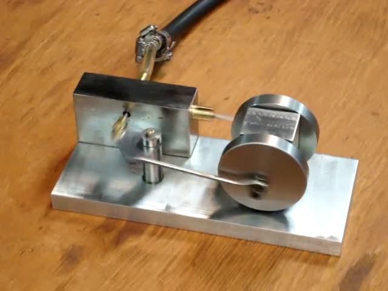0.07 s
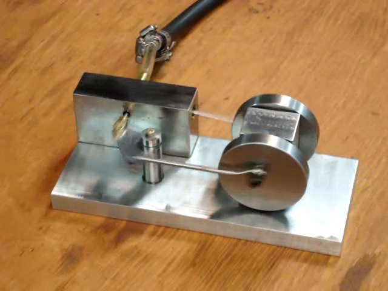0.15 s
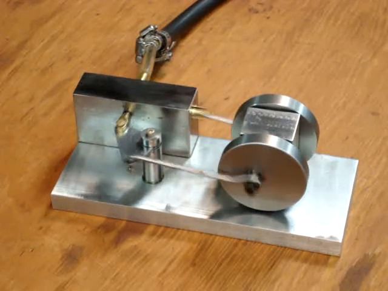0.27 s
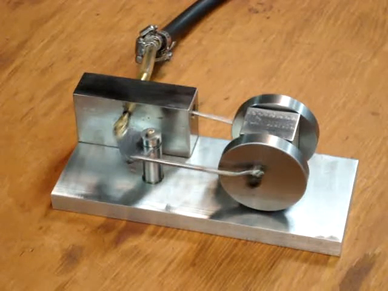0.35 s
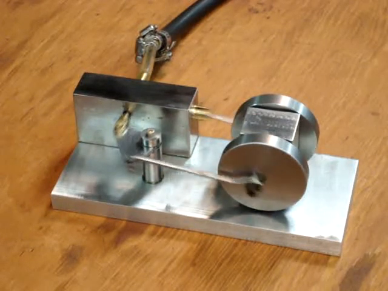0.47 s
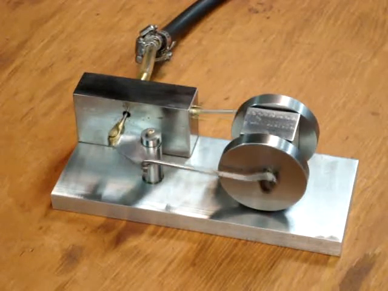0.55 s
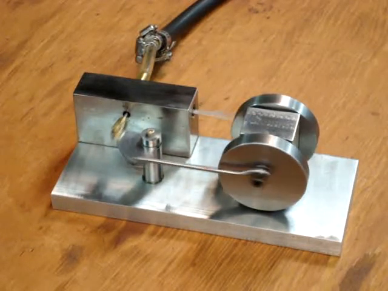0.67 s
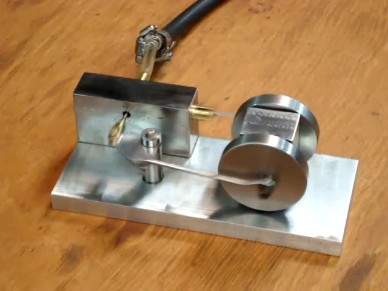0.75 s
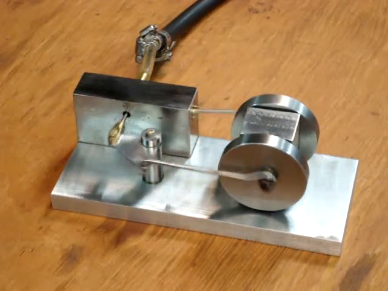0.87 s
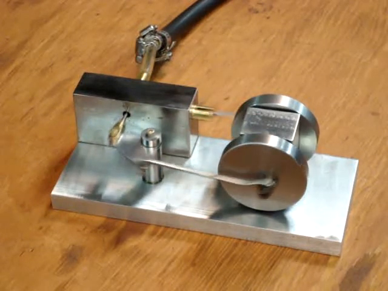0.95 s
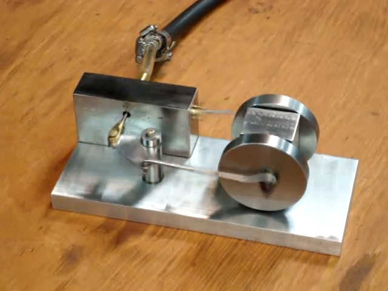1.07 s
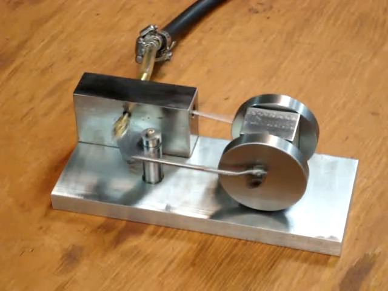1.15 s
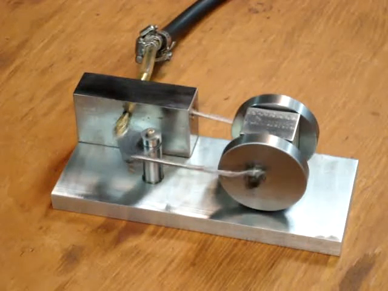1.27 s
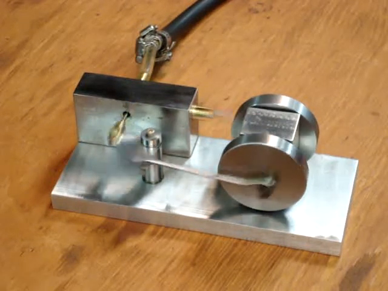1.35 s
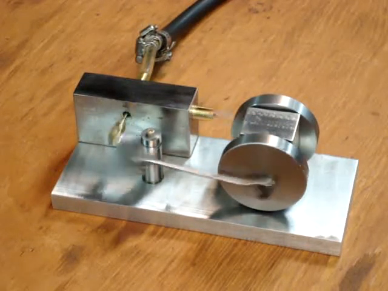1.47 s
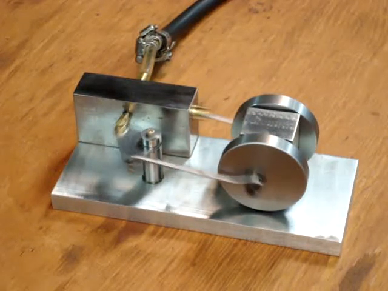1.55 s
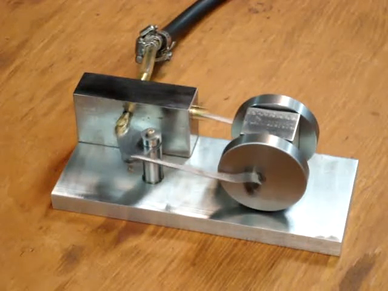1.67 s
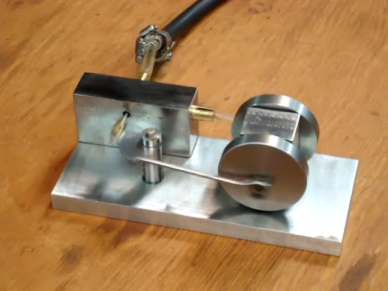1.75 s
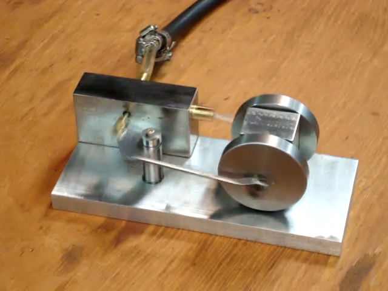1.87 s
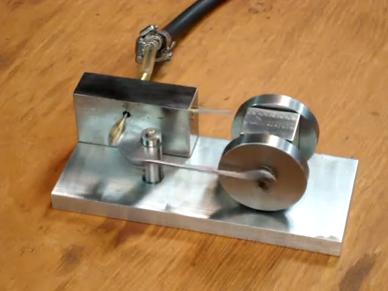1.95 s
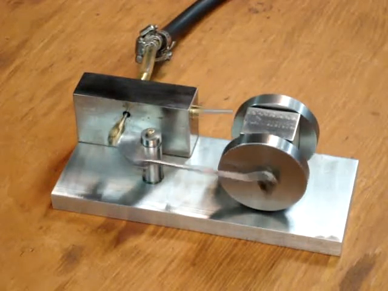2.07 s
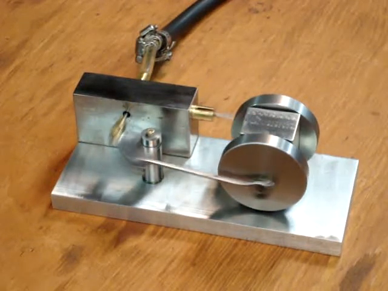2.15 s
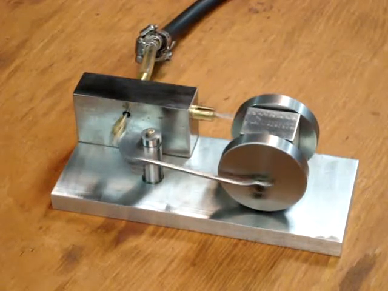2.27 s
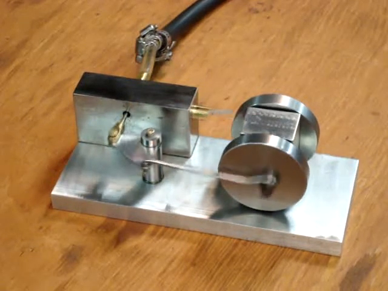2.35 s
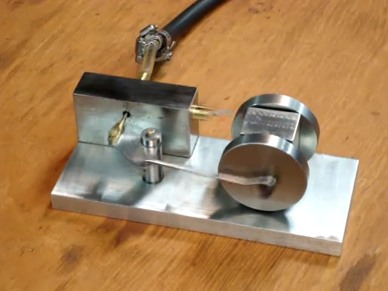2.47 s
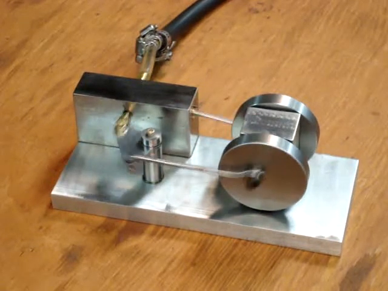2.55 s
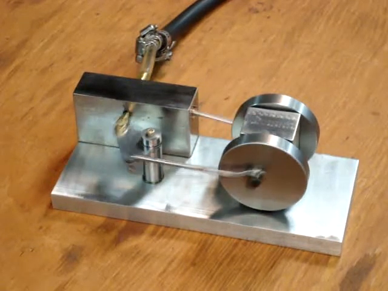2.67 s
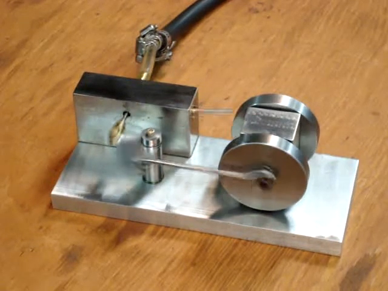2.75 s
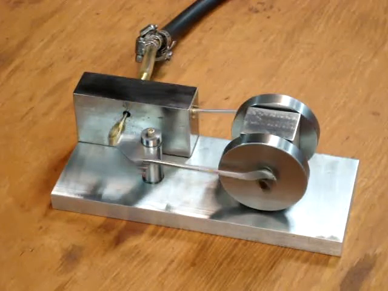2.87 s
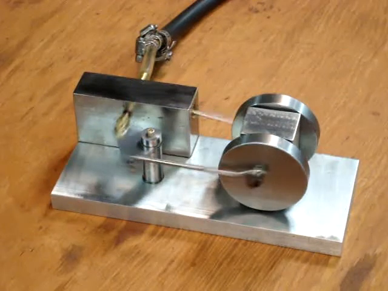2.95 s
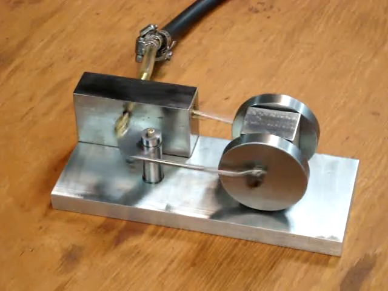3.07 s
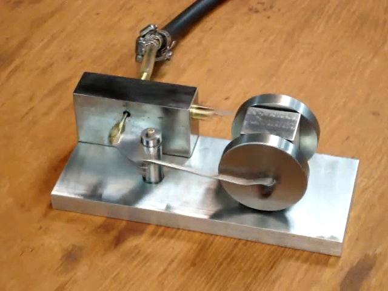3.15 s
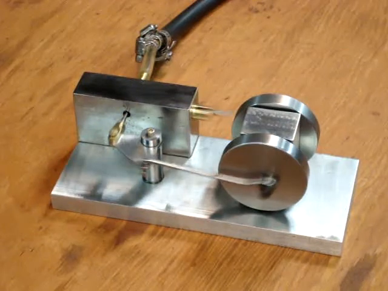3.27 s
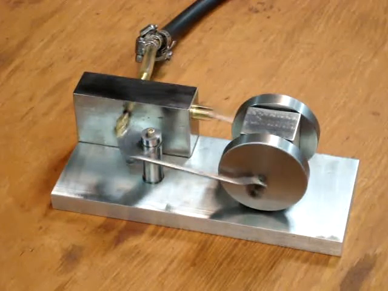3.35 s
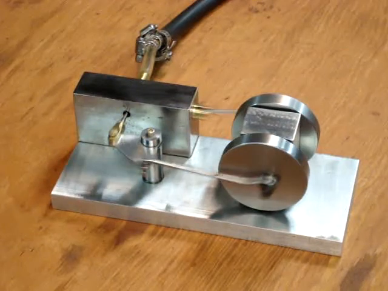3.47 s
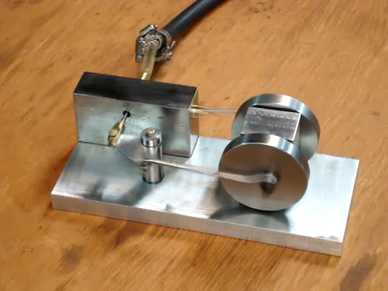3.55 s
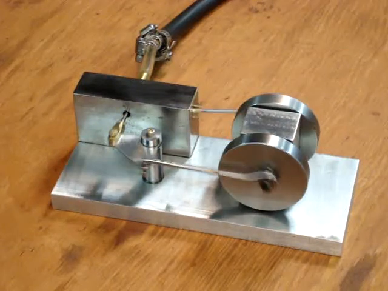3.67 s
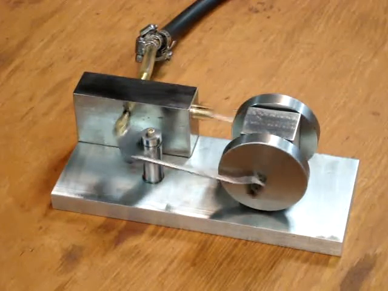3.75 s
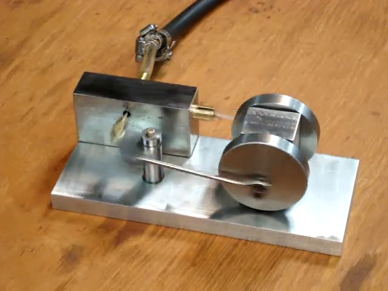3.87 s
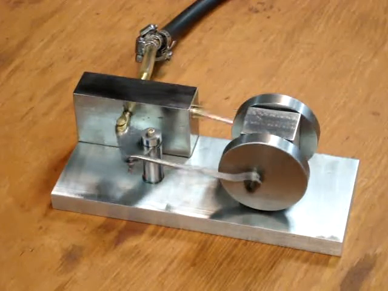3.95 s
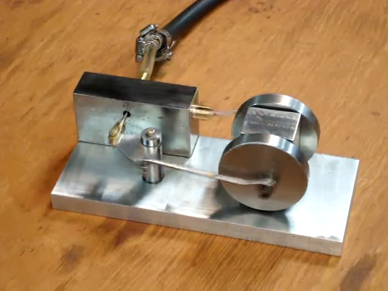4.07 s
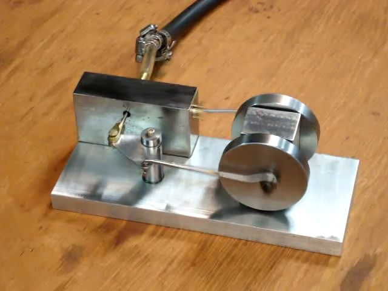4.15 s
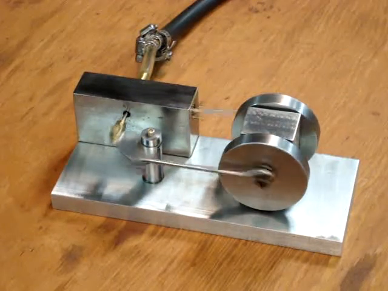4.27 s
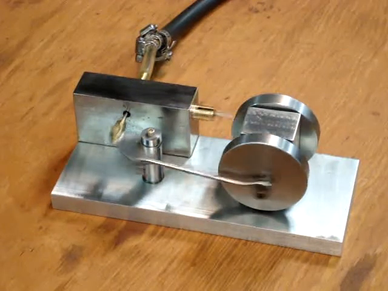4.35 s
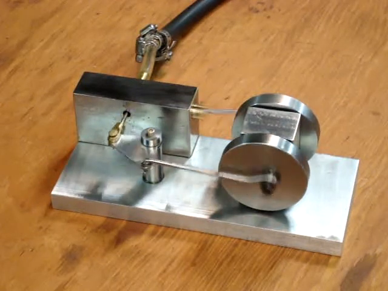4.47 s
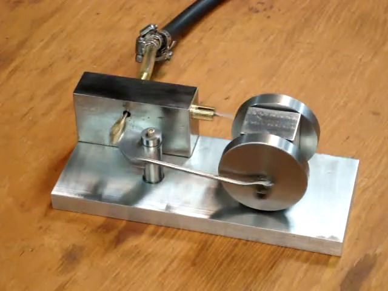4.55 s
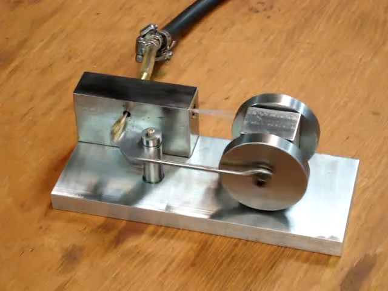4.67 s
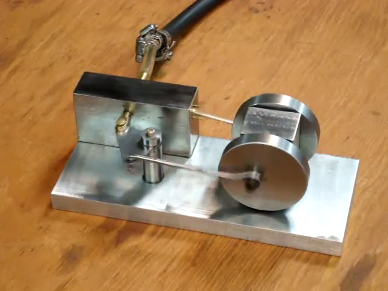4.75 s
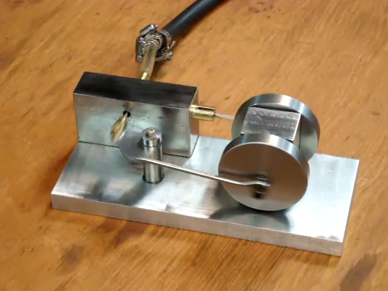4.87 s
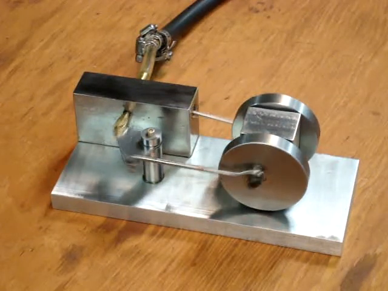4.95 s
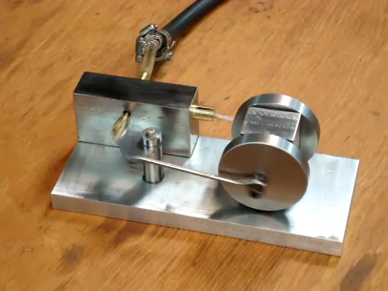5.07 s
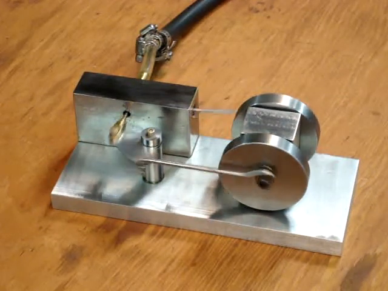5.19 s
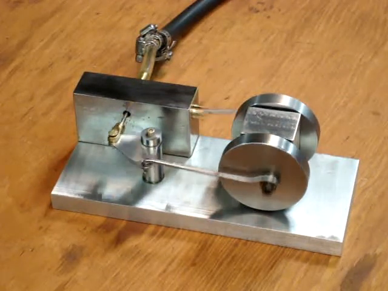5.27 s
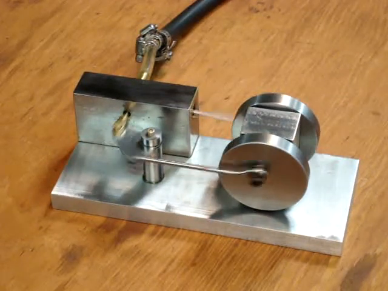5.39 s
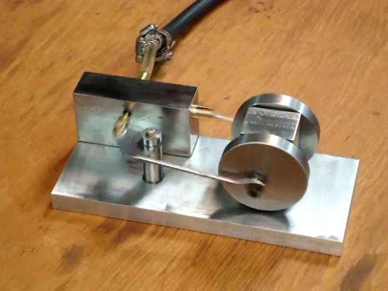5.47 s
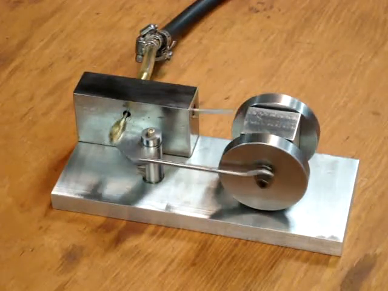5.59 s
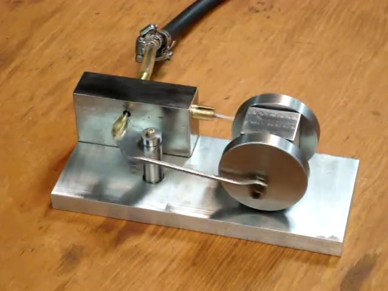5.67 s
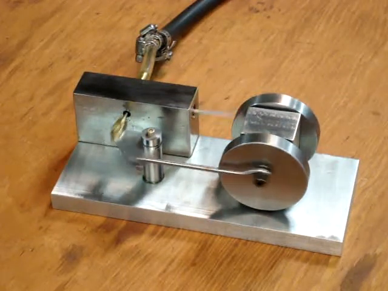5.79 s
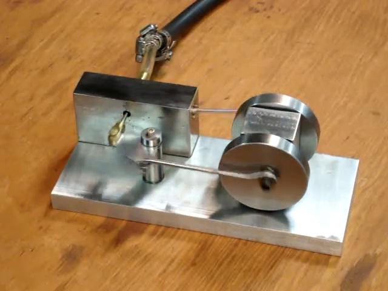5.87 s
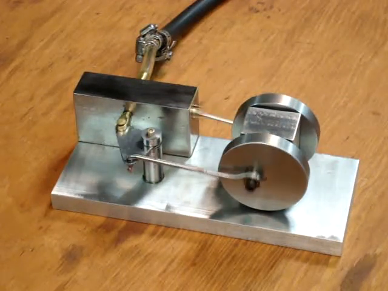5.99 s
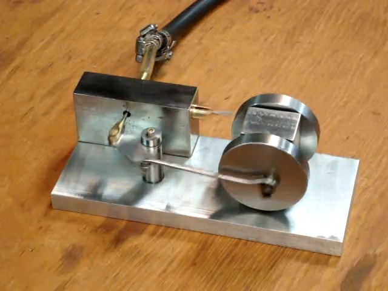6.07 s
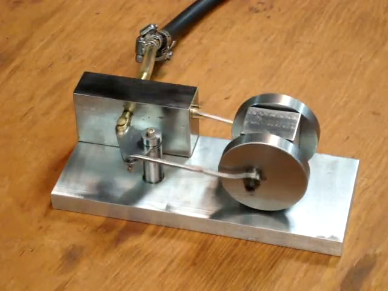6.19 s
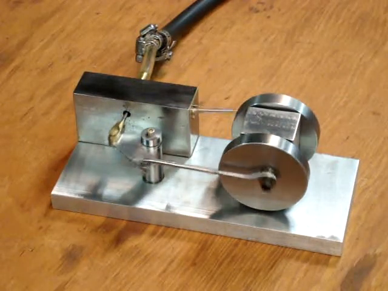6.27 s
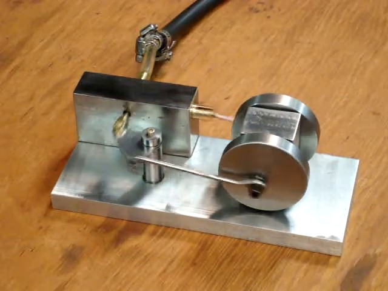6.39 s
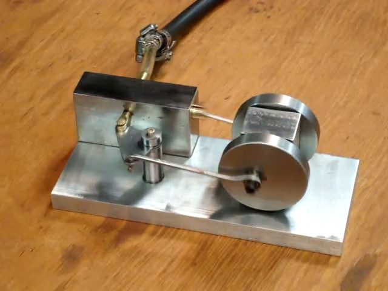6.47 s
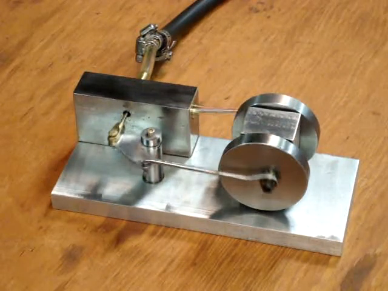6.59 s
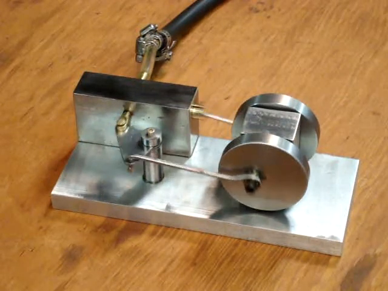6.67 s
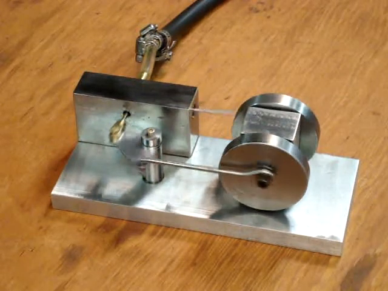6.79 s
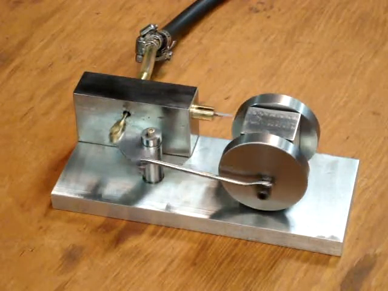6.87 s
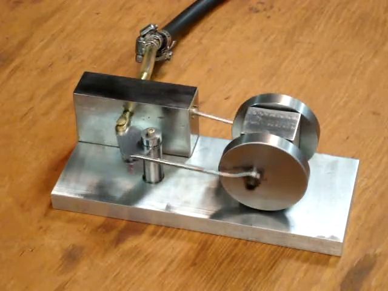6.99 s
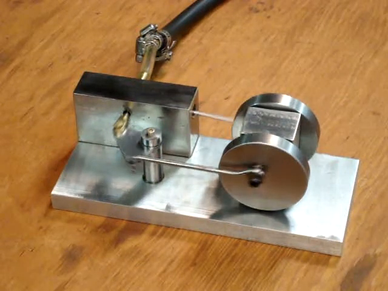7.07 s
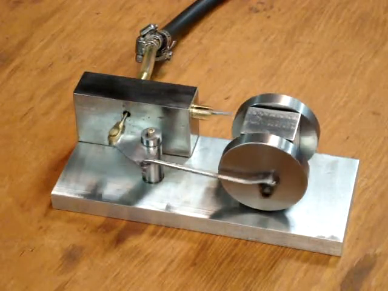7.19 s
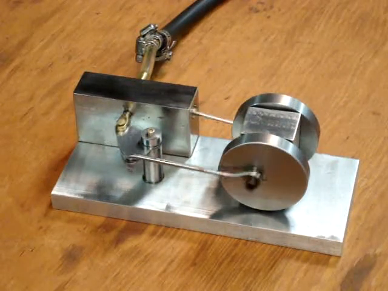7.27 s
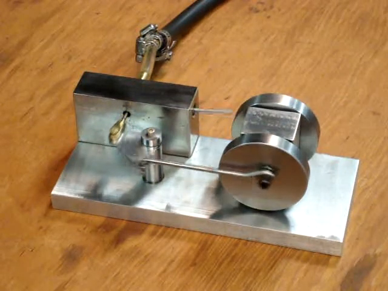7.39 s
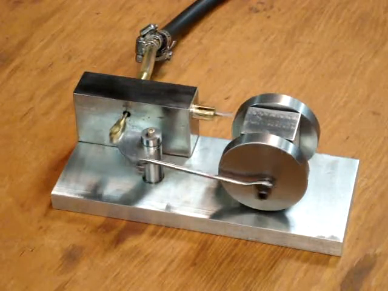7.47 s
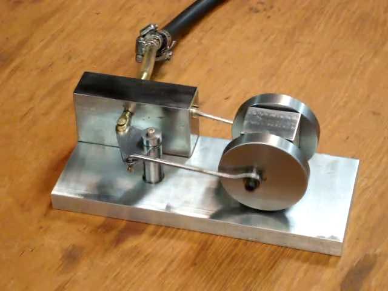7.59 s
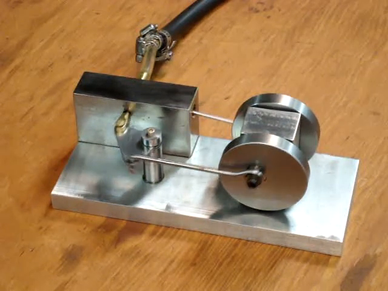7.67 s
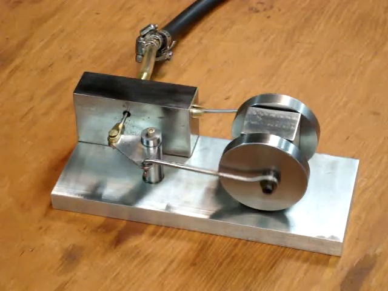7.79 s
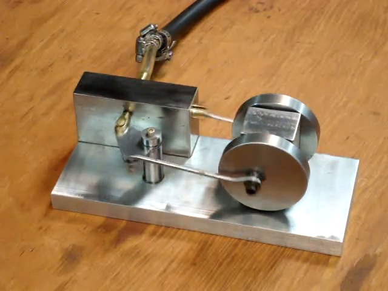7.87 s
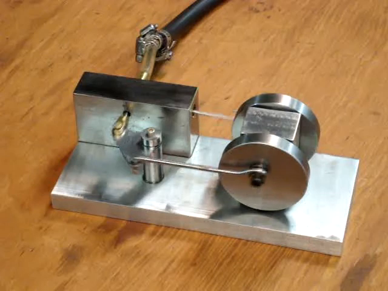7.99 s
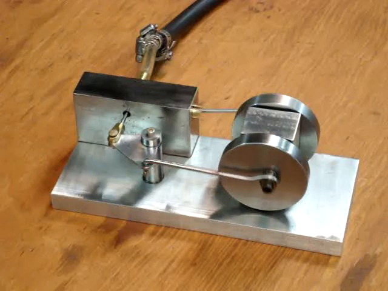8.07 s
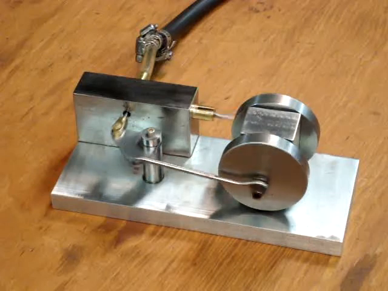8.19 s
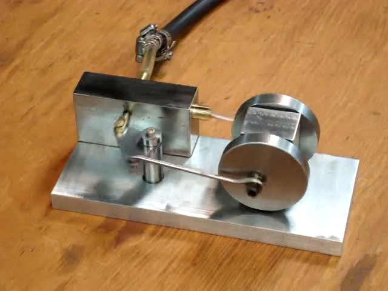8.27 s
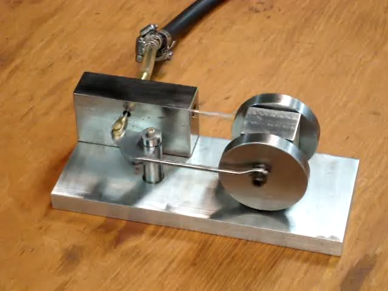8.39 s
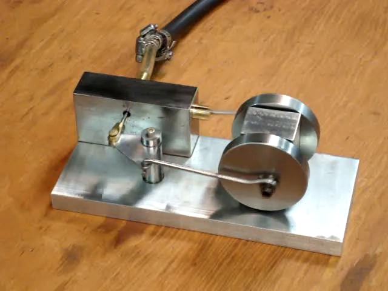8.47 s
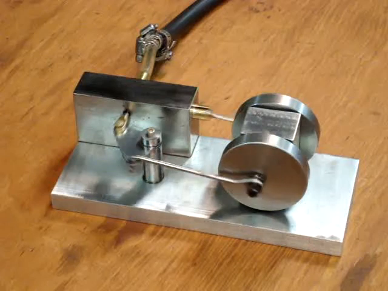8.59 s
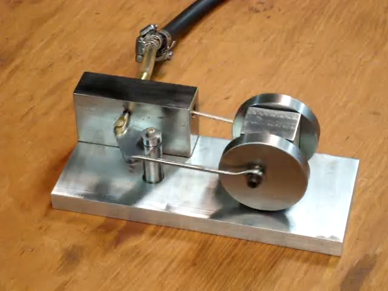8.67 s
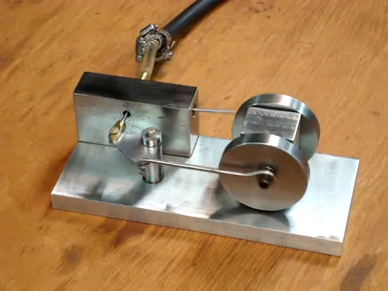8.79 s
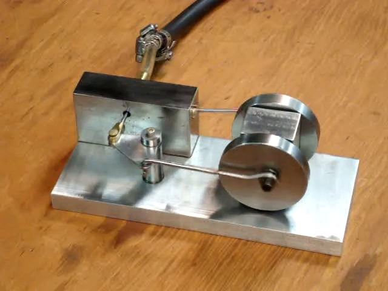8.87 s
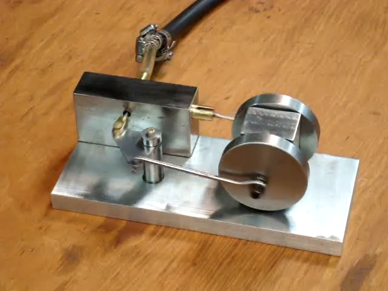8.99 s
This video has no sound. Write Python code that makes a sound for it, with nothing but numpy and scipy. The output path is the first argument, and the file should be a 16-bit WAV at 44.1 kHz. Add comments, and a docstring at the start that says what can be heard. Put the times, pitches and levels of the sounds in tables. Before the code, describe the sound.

A small metal compressed-air engine is already running, close by, at about six turns a second. Each turn brings a dry knock, two raspy exhaust puffs and a bright metallic tick, over a rumble through its base plate and the wooden table. Around 1 second the hissing puffs swell and the engine speeds up, reaching eight turns a second just before 2 seconds. The knocks are hardest between 2 and 3 seconds, as a long, steady slowdown begins and the air softens. Near 6 seconds the regular ticking breaks into a few stray clicks, and the puffs become soft, uneven chuffs. By 7 seconds the knock has almost gone. The engine crawls on with quiet chuffs and dull bumps, still making about two and a half turns a second at the end, around 9 seconds. Faint electric hum and small-room tone lie underneath.

```python
"""A small metal compressed-air engine runs on a wooden table, in a small room with a faint electric hum.
From the start, each turn brings a rod knock, two exhaust puffs and a valve-link tick, while the shaft
rumbles through base plate and table top. Around 1 s a burst of air swells the puffs and the flywheel
speeds up; from 2 s it winds down. Near 6 s the link goes slack and the puffs turn into soft, uneven
chuffs. By 7 s the knock has all but gone, and the engine crawls on to the end."""
import sys
import numpy as np
from scipy import signal
from scipy.fft import rfft, irfft
from scipy.io import wavfile

SR = 44100
rng = np.random.default_rng(int(sys.argv[2]) if len(sys.argv) > 2 else 0)


def to_wav(sig):
    """Store sig (one row per channel, or 1-D mono) as 16-bit WAV at the path in sys.argv[1].

    Samples outside -1..1 are clipped; the rate is SR.
    """
    pcm = np.clip(np.atleast_2d(sig), -1, 1) * 32767
    pcm = np.round(pcm).astype(np.int16)
    wavfile.write(sys.argv[1], SR, pcm.T)  # frames by channels


N = 398223
TIME = np.arange(N) / SR


def undb(db):
    """Decibels to gain."""
    return 10 ** (np.asarray(db) / 20)


def unit(x):
    """Scale to rms 1."""
    return x / np.sqrt(np.mean(x ** 2))


def seconds(length):
    """Sample times over a length in seconds."""
    return np.arange(int(length * SR)) / SR


def noise():
    """Fresh white noise."""
    return rng.standard_normal(N)


def lowpass(x, hz, order=4):
    """Roll off the highs."""
    return signal.sosfilt(signal.butter(order, hz, fs=SR, output="sos"), x)


def through(x, response):
    """Pass a sound through an impulse response."""
    return signal.fftconvolve(x, response)[:len(x)]


def colour(x, points):
    """Minimum-phase EQ through (f/Hz, level/dB) points, scaled to unit power gain."""
    hz, db = np.transpose(points)
    size = 4096
    bin_hz = np.arange(size // 2 + 1) * SR / size
    gain = undb(np.interp(np.log(bin_hz + 1), np.log(hz), db))
    cepstrum = irfft(np.log(unit(gain)))
    cepstrum[1:size // 2] *= 2
    cepstrum[size // 2 + 1:] = 0
    return through(x, irfft(np.exp(rfft(cepstrum))))


def ring(modes):
    """Impulse response of damped modes."""
    t = seconds(.5)
    return sum(undb(db) * np.cos(2 * np.pi * hz * t) * undb(-60 * t / t60) for hz, db, t60 in modes)


def blows(times, db):
    """One impulse for each hit."""
    out, at = np.zeros(N), np.round(times * SR).astype(int)
    inside = (at >= 0) & (at < N)
    np.add.at(out, at[inside], undb(db)[inside])
    return out


def diffuse(t60, rise):
    """Dense reflections that build up and die away; unit energy."""
    t = seconds(.5)
    tail = rng.standard_normal(len(t)) * undb(-60 * t / t60) * (1 - np.exp(-(t / rise) ** 2))
    return tail / np.sqrt(np.sum(tail ** 2))


def swells(times, db, widths, skew=0):
    """A bell-shaped envelope around each time; skew makes the attack faster than the release."""
    envelope = np.zeros(N)
    for at, gain, width in zip(times, undb(db), widths):
        i = np.arange(max(int((at - 5 * width) * SR), 0), min(int((at + 5 * width) * SR), N))
        lag = i / SR - at
        envelope[i] += gain * np.exp(-(lag / (width * np.exp(skew * np.sign(lag)))) ** 2 / 2)
    return envelope


def wander(hz):
    """Smooth random modulation up to a given rate; rms 1."""
    return unit(lowpass(noise(), hz, order=2))


def whistle(hz, width_hz):
    """Turbulence in a narrow gap: a breathy band of noise on a steady or moving pitch."""
    phase = 2 * np.pi * np.cumsum(np.broadcast_to(hz, N)) / SR
    return unit(wander(width_hz / 2) * np.cos(phase) + wander(width_hz / 2) * np.sin(phase))


# Mains hum partials: f/Hz, level/dB
HUM_PARTIALS = [(120, -89.5), (240, -73.5), (1320, -91), (1560, -73.5), (1680, -83.5)]
# Room tone EQ: f/Hz, level/dB (relative)
ROOM_TONE_EQ = [(25, -8.5), (60, -6.5), (120, -1.5), (200, 3), (450, 12), (1000, 4), (1800, 1), (3000, 0),
                (5000, -3), (8000, -7.5), (10200, -10)]
def background():
    """The bed: soft, steady room tone and an electric hum."""
    hum = sum(undb(db) * np.sqrt(2) * np.sin(2 * np.pi * (hz * TIME + rng.random()))
              for hz, db in HUM_PARTIALS)
    return hum + undb(-57) * colour(noise(), ROOM_TONE_EQ)


def room(x, early_db, late_db):
    """Add reflections from nearby things, then the tail of a small room."""
    early = undb(early_db) * diffuse(t60=.017, rise=.0011)
    late = undb(late_db) * diffuse(t60=.31, rise=.02)
    return x + through(x, early + late)


# Flywheel speed curve: t/s, speed/(turns per s)
SPEED_CURVE = [(0.0, 5.715), (0.56, 5.678), (0.89, 6.003), (1.43, 7.628), (1.71, 8.022), (2.03, 8.01),
               (3.02, 7.51), (3.56, 7.032), (4.78, 5.574), (5.54, 4.852), (6.72, 3.662), (8.14, 2.808),
               (9.03, 2.535)]
FULL_SPEED, SLACK_SPEED = 8, 4.5  # turns per s; the valve gear hangs loose below the slack speed
def speed(t):
    """Turns per second of the flywheel at the given times."""
    return np.interp(t, *np.transpose(SPEED_CURVE))


def by_speed(t, full_db, slope_db):
    """A level that rides the flywheel: full_db at full speed, plus slope_db per doubling."""
    return full_db + slope_db * np.log2(speed(t) / FULL_SPEED)


def flywheel():
    """The engine's clock: angle in turns, time of each dead centre and length of the turn after it."""
    t = seconds(N / SR + 1)
    angle = np.cumsum(speed(t)) / SR
    angle = angle - np.interp(.0298, t, angle)  # time of the first dead centre
    centres = np.interp(np.arange(int(angle[N]) + 2), angle, t)
    return angle[:N], centres[:-1], np.diff(centres)


# Air supply, opened up briefly and then eased off: t/s, level/dB
PRESSURE_CURVE = [(0, -16.5), (.48, -16.5), (.8, -9), (1.12, -5.5), (1.32, -7), (1.7, -12.5), (3, -17.5),
                  (4.4, -23.5), (5.9, -25), (6.8, -25.5), (9.03, -24)]
def pressure(t):
    """Air pressure at the valve, in dB."""
    return np.interp(t, *np.transpose(PRESSURE_CURVE))


def sliding_air(angle):
    """Grainy rush of air along the piston and valve rod, strongest at mid-stroke and high pressure."""
    db = by_speed(TIME, -55, slope_db=11) + pressure(TIME) + 11 * wander(300)
    rush = colour(noise(), [(300, -23), (2500, 3.5), (4200, 10), (6200, 7), (7500, -16), (10000, -14)])
    return undb(db) * np.abs(np.sin(2 * np.pi * angle)) * rush


def leaks(times, period, angle, out_db, back_db):
    """Air squeezed past the piston rises in pitch toward dead centre; the valve slit whistles down."""
    from_centre = (angle + .5) % 1 - .5
    squeeze_hz = np.interp(from_centre, [-.07, .01], [1950, 2700])
    squeeze = swells(times - .003, out_db - 10.5, .039 * period) * whistle(squeeze_hz, width_hz=530)
    leak_db = 2 * (back_db - back_db.max())  # the valve only leaks audibly at high pressure
    slit_hz = np.interp(angle % 1, [.40, .56], [9700, 7300])
    slit = swells(times + .49 * period, leak_db - 45.5, .05 * period) * whistle(slit_hz, width_hz=900)
    spray = swells(times + .27 * period, leak_db - 42, .019 * period) * whistle(9200, width_hz=1800)
    closing = swells(times + .88 * period, leak_db - 48.5, .07 * period) * whistle(6700, width_hz=960)
    return squeeze + slit + spray + closing


# Light play in the valve gear: angle/turns, level/dB at full speed
PIN_HITS = [(.118, -40.5), (.622, -42)]
# Ring of small steel pins: f/Hz, level/dB, t60/s
PIN_MODES = [(2970, -5, 0.02), (4090, -5, 0.012), (6550, -3, 0.023), (8600, -5, 0.01), (9300, -2.5, 0.0069)]
def pins(times, period):
    """Faint uneven clicks as the valve gear's pins shift in their holes, until the gear goes slack."""
    driven = speed(times) > SLACK_SPEED
    times, period, contact = times[driven], period[driven], 0
    for turn, db in PIN_HITS:
        timing, accent = rng.standard_normal((len(times), 2)).T
        at = times + (turn + .0041 * timing) * period
        contact = contact + blows(at, by_speed(at, db, slope_db=13) + 2 * accent)
    clicks = through(contact, ring(PIN_MODES))
    return colour(clicks, [(300, -27), (2500, 3.5), (4000, 4.5), (10000, -1.5)])


# Two swells of rumble in the power stroke: angle/turns, level/dB against the load, width/turns
RUMBLE_SWELLS = [(0.146, -3, 0.033), (0.321, -0.5, 0.03)]
LOAD_DB, LOAD_SLOPE_DB = -41, 8  # force of the running shaft on the table
def shaft(times, period, angle):
    """Shaft rumble: constant rubbing, a thump and dull swells each turn, a bump as the valve reverses."""
    load_db = by_speed(TIME, LOAD_DB, LOAD_SLOPE_DB)
    stroke_db = by_speed(times, LOAD_DB, LOAD_SLOPE_DB)
    # the same rough spots come round on every turn
    spots = 40
    offset, roughness = rng.standard_normal((spots, 2)).T
    spot_angles = np.arange(-1, len(times))[:, None] + (np.arange(spots) + .5 * offset) / spots
    spot_at = np.interp(spot_angles, angle, TIME)
    inside = (spot_at > 0) & (spot_at < TIME[-1])
    grains = blows(spot_at[inside], np.broadcast_to(4 * roughness, spot_at.shape)[inside])
    grind = unit(through(grains, diffuse(t60=.03, rise=.0021)))
    # the bearing is pressed hardest during the power stroke
    press = undb(load_db + .62 * np.cos(2 * np.pi * (angle - .22)))
    rub = press * (undb(-9) * grind + undb(-5.5) * unit(noise()))
    thump = through(blows(times + .01163 * period, stroke_db + 28.5), diffuse(t60=.097, rise=.005))
    reversal = blows(times + .70 * period, np.full(len(times), -19))
    reversal = lowpass(through(reversal, diffuse(t60=.088, rise=.012)), 620)
    surge = sum(swells(times + turn * period, stroke_db + db, width * period)
                for turn, db, width in RUMBLE_SWELLS)
    return rub + thump + surge * lowpass(noise(), 690) + reversal


# Power stroke, return and valve reversal: angle/turns, level/dB at full speed, slope/dB per doubling
BUMP_HITS = [(.25, -32, 7), (.585, -37, 7.5), (.712, -36, 0)]
# How the bumps couple into the plate: f/Hz, level/dB (relative)
BUMP_EQ = [(300, -16), (455, -1.5), (530, 0.5), (680, -3.5), (950, -4.5), (1300, -11), (3000, -35)]
def bumps(times, period):
    """Dull blows that the moving parts give the base plate at set angles."""
    contact = 0
    for turn, db, slope_db in BUMP_HITS:
        at = times + turn * period
        contact = contact + blows(at, by_speed(at, db, slope_db) + 1.5 * rng.standard_normal(len(at)))
    return colour(contact, BUMP_EQ)


# How the shove couples into the plate: f/Hz, level/dB (relative)
SHOVE_EQ = [(300, -21.5), (455, -13.5), (525, -2.5), (600, -17.5), (680, -4), (800, -6), (900, 3.5),
            (970, 6.5), (1080, -10), (1300, -4), (3000, -34.5)]
def shove(times):
    """The stroke shoves the base plate just after each knock."""
    db = by_speed(times, -29.5, slope_db=9) + .52 * rng.standard_normal(len(times))
    return colour(blows(times + .00599, db), SHOVE_EQ)


# Ring of the base plate on the table top: f/Hz, level/dB (relative), t60/s
PLATE_MODES = [(328, -17.5, 0.24), (347, -16, 0.2), (402, -12.5, 0.21), (455.8, -2.5, 0.23),
               (525.7, -1, 0.2), (543, -6, 0.29), (590, -32, 0.13), (672.8, -2, 0.17), (920, -24, 0.21),
               (957, -1, 0.12), (1004, -9, 0.13), (1047.4, -4, 0.18), (1097, -2.5, 0.075),
               (1202, -4.5, 0.15)]
# Woody body of the table top: f/Hz, level/dB (relative)
WOOD_EQ = [(40, -39.5), (90, -38.5), (170, -16), (270, -21), (400, -5), (520, 3), (700, -3.5), (810, -7.5),
           (980, -0.7), (1200, -11), (1380, -15), (1530, -8.5), (1900, -23.5), (6000, -43.5)]
def plate_and_table(times, period, angle):
    """One bearing, the shove and the bumps ring the base plate; the other bearing shakes the wood."""
    modes = ring(PLATE_MODES)
    force = shove(times) + undb(-3.5) * shaft(times, period, angle) + bumps(times, period)
    plate = through(force, modes / np.sqrt(np.sum(modes ** 2)))
    low_cut = signal.butter(2, 280, "highpass", fs=SR, output="sos")  # a small plate has little bass
    wood = undb(-3.5) * colour(shaft(times, period, angle), WOOD_EQ)
    return signal.sosfilt(low_cut, plate) + wood


# The slack link catches now and then: t/s, level/dB
SLACK_TICKS = [(5.992, -50), (6.472, -48), (6.739, -55), (7.3088, -50.5), (7.6204, -52)]
def valve_reversals(times, period):
    """Cue times and levels for the link: once a turn as the valve reverses, then only stray ticks."""
    at = times + .719 * period + .0028  # the link crosses its play just after the reversal
    db = by_speed(at, -39.5, slope_db=11) + rng.standard_normal(len(at))
    db = db - .15 * pressure(at)  # air cushions the tick
    regular = np.column_stack([at, db])[speed(at) > SLACK_SPEED]
    return np.vstack([regular, SLACK_TICKS]).T


# Bright ring of the valve link: f/Hz, level/dB, t60/s
LINK_MODES = [(3150, -10, .007), (3610, -12, .007), (3920, -3, .009), (4140, -5.5, .014), (4310, -14, .09),
              (4490, -21, .07), (4555, -22, .07), (4670, -13, .012), (5020, -12, .009), (5250, -8, .016),
              (5310, -18.5, .08), (5500, -12, .007)]
def valve_link(times, db):
    """The link ticks, rebounds a few milliseconds later, then chatters as it drags the valve back."""
    timing, accent, drag_timing = rng.standard_normal((len(times), 3)).T
    rebound = blows(times + .0037 + .0003 * timing, db - 5 + accent)
    contact = blows(times, db) + rebound
    chatter = undb(-21) * noise() * through(contact, np.exp(-seconds(.1) / .0036))
    tick = through(undb(-1) * contact + chatter, ring(LINK_MODES))
    tick_eq = [(300, -24.5), (2000, -1), (3800, -4.5), (5500, -2), (6500, -21.5), (10000, -10.5)]
    drag = swells(times + .018 + .002 * drag_timing, db - 12.5, np.full(len(times), .008))
    scrape = drag * undb(2 * wander(180)) * whistle(4480, width_hz=720)
    return colour(tick, tick_eq) + scrape


# Hiss of the exhaust jet: f/Hz, level/dB (relative)
JET_EQ = [(300, -42), (1500, -7), (2700, -8.5), (4000, -12.5), (5700, -8.5), (6500, -3.5), (6950, -1),
          (7400, -0.5), (8300, -4), (9200, -5.5), (10200, -14)]
def jet(hz, width_hz, hiss_db, whistle_db):
    """Air leaving the port: a broad hiss with a breathy whistle on top."""
    return undb(hiss_db) * colour(noise(), JET_EQ) + undb(whistle_db) * whistle(hz, width_hz)


def sputter(trim_db):
    """Fast random gain flutter that gives the jet its rasp."""
    return undb(2.8 * wander(180) + trim_db)


# Uneven puffs at a crawl, two a turn: t/s, level/dB, half length/s
CHUFF_CUES = [(6.06, -46.5, .0055), (6.181, -49, .004), (6.299, -44.5, 0.0045), (6.426, -47, 0.0032),
              (6.55, -44.5, 0.0051), (6.686, -49.5, 0.0046), (6.817, -44.5, 0.0057), (6.963, -47.5, 0.0039),
              (7.102, -45, 0.0085), (7.255, -44.5, 0.0045), (7.405, -43, .0062), (7.564, -46.5, 0.004),
              (7.725, -41, 0.0061), (7.889, -47, 0.0057), (8.06, -40, 0.0052), (8.236, -46, 0.0056),
              (8.414, -44.5, 0.0089), (8.605, -45, 0.0045), (8.795, -42, 0.0074), (8.996, -48, 0.0059)]
def chuffs():
    """The crawling engine lets out single soft puffs; each whistles around one pitch and sputters."""
    flow = swells(*np.transpose(CHUFF_CUES), skew=.1)
    air = jet(7380 + 250 * wander(40.1), width_hz=1080, hiss_db=-5.5, whistle_db=-3)
    return flow * air * sputter(trim_db=-1)


def exhaust(times, period, angle, out_db, back_db):
    """Two rasping puffs a turn: the first swells and whistles up, the second snaps open and falls."""
    length_spread, pitch_spread_hz = .12, 258  # from puff to puff
    out_stretch, back_stretch, out_detune, back_detune = rng.standard_normal((len(times), 4)).T
    out_s = (.0028 + .0058 * period) * np.exp(length_spread * out_stretch)
    back_s = (.0034 + .0059 * period) * np.exp(length_spread * back_stretch)
    out = swells(times + .042 * period + .0015, out_db - .5, out_s)
    seep = swells(times + .026 * period, out_db - 11, .013 * period)  # the port starts to uncover
    back = swells(times + .499 * period + .0072, back_db + .5, back_s, skew=.35)
    # the jet's pitch follows the opening of the port
    out_hz = np.interp((angle + .5) % 1 - .5, [0, .07], [6600, 8000])
    out_hz += pitch_spread_hz * np.interp(TIME, times, out_detune)
    back_hz = np.interp(angle % 1, [.5, .6], [8100, 6500])
    back_hz += pitch_spread_hz * np.interp(TIME, times + period / 2, back_detune)
    out_jet = jet(out_hz, width_hz=840, hiss_db=-2.5, whistle_db=-2)
    back_jet = jet(back_hz, width_hz=900, hiss_db=-2, whistle_db=-1.5)
    return sputter(trim_db=-.04) * ((out + seep) * out_jet + back * back_jet)


# Knock: cushioned at high pressure, hardest at top speed, fading as the slow rod seats: t/s, level/dB
KNOCK_CURVE = [(0, -29), (.9, -27.5), (1.3, -26), (1.73, -26.5), (1.98, -23), (2.7, -22), (4, -25.5),
               (4.8, -25.3), (5.2, -28.5), (6.05, -29), (6.29, -33.5), (6.54, -32.5), (6.82, -38),
               (7.1, -45)]
def stroke_levels(times):
    """Each turn's levels for the knock and the two puffs; the puffs ride speed and air pressure."""
    knock_accent, out_accent, back_accent = rng.standard_normal((len(times), 3)).T
    knock_db = np.interp(times, *np.transpose(KNOCK_CURVE))
    out_db = by_speed(times, -32.5, slope_db=.5) + .71 * pressure(times)
    back_db = by_speed(times, -34.5, slope_db=-8) + pressure(times)  # a slow cylinder has time to fill
    return knock_db + .4 * knock_accent, out_db + 2.1 * out_accent, back_db + 2.1 * back_accent


# Dry clack of the connecting rod: f/Hz, level/dB, t60/s
ROD_MODES = [(2493, -2, 0.0043), (2820, -6.5, 0.00085), (3400, -24.5, 0.0028), (2667, -41, 0.089)]
def rod_knock(times, db):
    """The rod bearing knocks at dead centre in three quick touches, then rattles in its play."""
    rattle_span_s, fade_db_per_s = .022, 300.5
    lead_accent, trail_accent, timing = rng.standard_normal((len(times), 3)).T
    lead = blows(times - .0003, db - 7 + .5 * lead_accent)
    hit = blows(times + .00008, db + 2)
    trail = blows(times + .00085 + .00003 * timing, db - 8 + trail_accent)
    lags = .001785 + rattle_span_s * rng.random(size=(len(times), 7)) ** 1.5
    rattle_db = db[:, None] - 10.5 - fade_db_per_s * lags + 3 * rng.standard_normal(lags.shape)
    rattle = blows((times[:, None] + lags).ravel(), rattle_db.ravel())
    contact = lead + hit + trail + rattle
    grit = noise() * through(contact, np.exp(-seconds(.05) / .0013))
    grit_eq = [(300, -22.5), (1200, 8), (2000, -9), (4200, -.5), (6000, -1), (7500, 1), (10000, -17)]
    clack = through(contact, ring(ROD_MODES))
    clack_eq = [(300, -29), (1600, -7.5), (2200, -3.5), (3400, 1), (4000, -14.5), (10000, -10)]
    return undb(-5.5) * colour(clack, clack_eq) + undb(-16.5) * colour(grit, grit_eq)


def scene():
    """Mix knocks, ticks, air and rumble over the bed, with the flywheel as the clock."""
    angle, times, period = flywheel()
    knock_db, out_db, back_db = stroke_levels(times)
    knocks = room(rod_knock(times, knock_db), early_db=-5.5, late_db=-13)
    ticks = valve_link(*valve_reversals(times, period)) + pins(times, period)
    ticks = room(ticks, early_db=-35, late_db=-9.5)
    brisk = times < 6  # the chuffs take over at 6 s
    puffs = exhaust(times[brisk], period[brisk], angle, out_db[brisk], back_db[brisk]) + chuffs()
    air = puffs + sliding_air(angle) + leaks(times, period, angle, out_db, back_db)
    air = room(air, early_db=-12, late_db=-17)
    return (knocks + ticks + air + plate_and_table(times, period, angle) + background())[None]


def record(dry):
    """A steep high cut near 10 kHz."""
    return signal.sosfilt(signal.ellip(10, .2, 55, 10020, fs=SR, output="sos"), dry)


dry = scene()
out = record(dry)
to_wav(out)
```